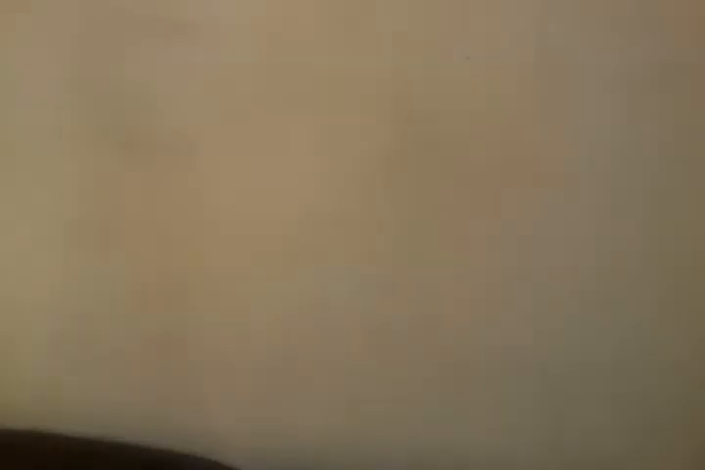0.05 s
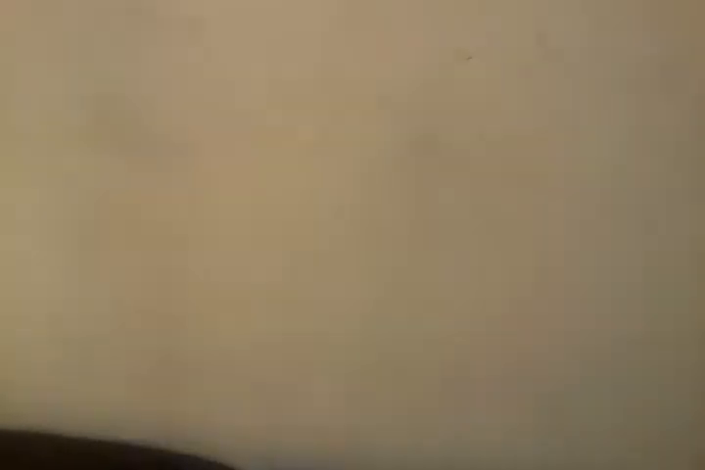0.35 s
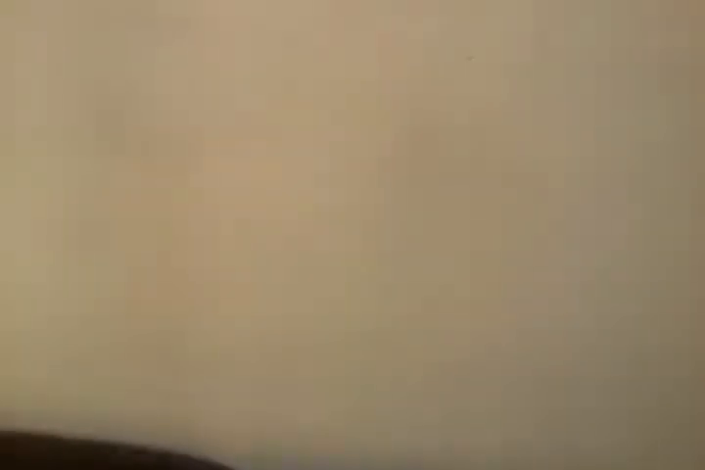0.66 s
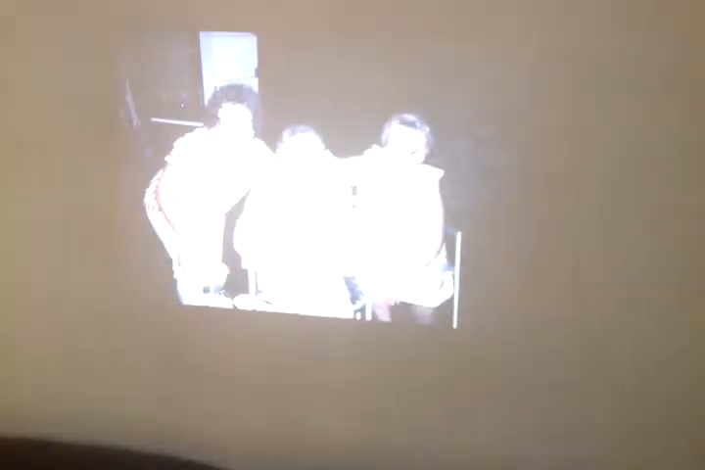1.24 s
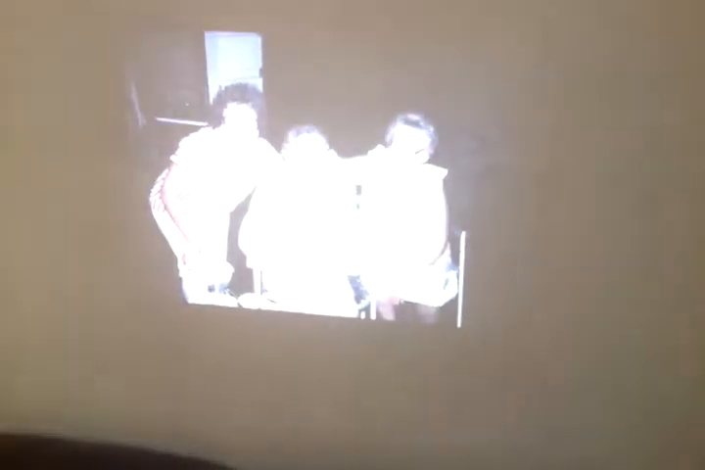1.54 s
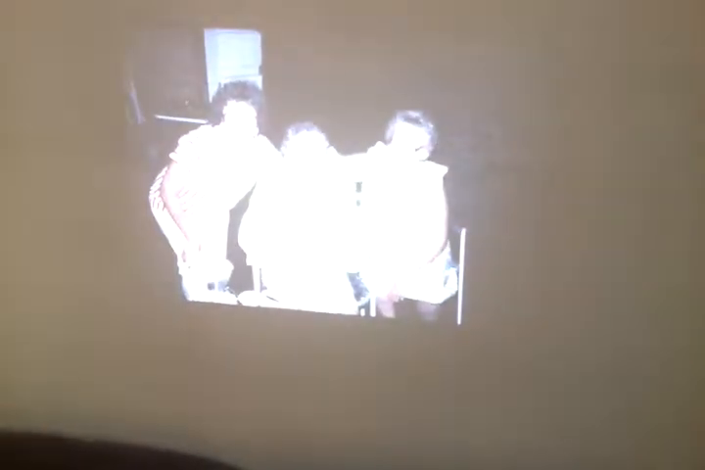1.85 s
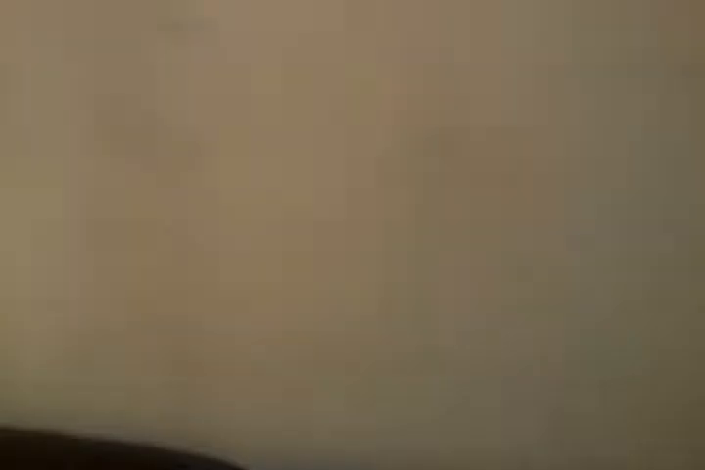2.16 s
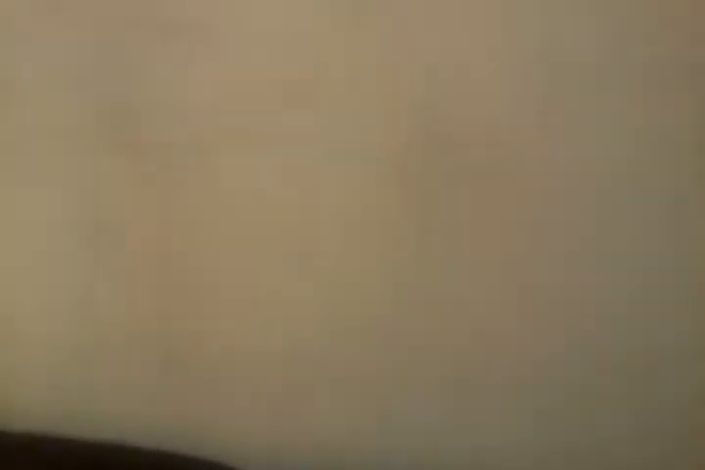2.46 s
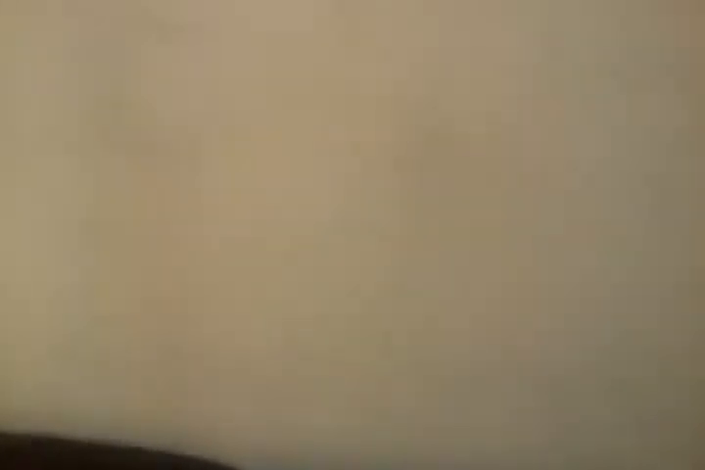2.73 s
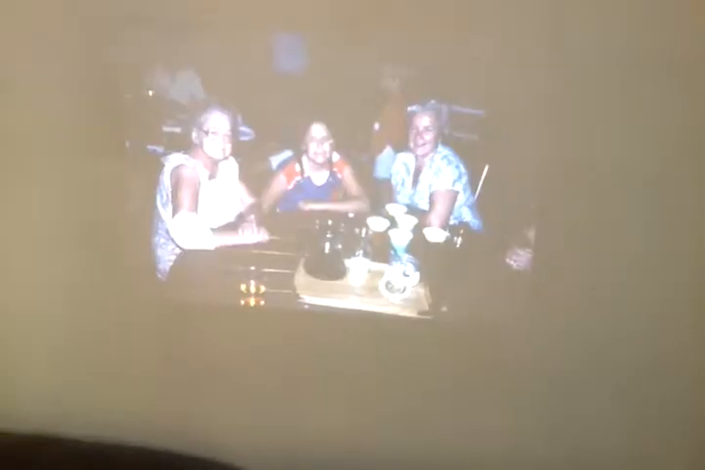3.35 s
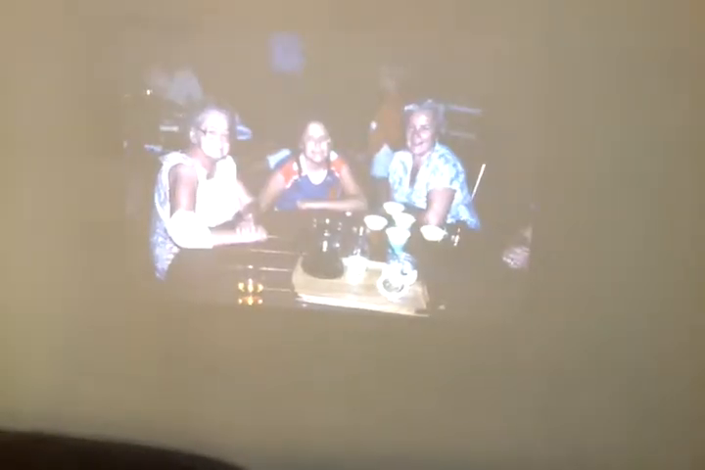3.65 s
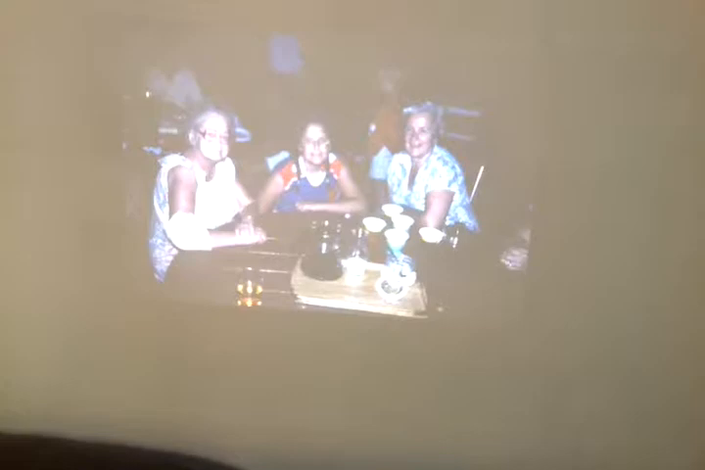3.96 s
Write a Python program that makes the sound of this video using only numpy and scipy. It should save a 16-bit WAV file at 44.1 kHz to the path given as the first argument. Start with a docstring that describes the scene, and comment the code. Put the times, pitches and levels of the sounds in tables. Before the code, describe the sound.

A slide projector changes slides twice in a room, each change a quick run of mechanical clacks and rattles. Its cooling fan rushes steadily throughout, with a low hum and a thin whine.

```python
"""A slide projector changes slides twice in a living room, over the rush and whine of its cooling fan.
Each change is a run of impacts: the shutter shuts, the slide is lifted, the tray steps on, the next slide
drops and the shutter opens. Each impact excites the damped modes of a part; the housing resonates and
the room reverberates. Air through the fan gives broadband noise, the motor and blades give tones."""
import sys
import numpy as np
from scipy import signal
from scipy.fft import rfft, irfft
from scipy.io import wavfile

SR = 44100
rng = np.random.default_rng(int(sys.argv[2]) if len(sys.argv) > 2 else 0)


def generate_wav(sig):
    """Save sig (samples, or channels by samples) to the path in sys.argv[1] as 16-bit PCM at SR."""
    pcm = np.round(np.clip(np.atleast_2d(sig).T, -1, 1) * 32767).astype(np.int16)
    wavfile.write(sys.argv[1], SR, pcm)


N = 176400
TIME = np.arange(N) / SR
HZ = np.maximum(np.arange(N // 2 + 1) * SR / N, 1)


def from_db(db):
    """Amplitude ratio of a level in decibels."""
    return 10 ** (np.asarray(db) / 20)


def rms_one(x):
    """Normalisation to unit rms."""
    return x / np.sqrt(np.mean(np.abs(x) ** 2) + 1e-20)


def at_hz(points, hz):
    """Interpolation on a logarithmic frequency axis."""
    points = np.array(points)
    return np.interp(np.log(hz), np.log(points[:, 0]), points[:, 1])


def drift(rate_hz):
    """Low-passed noise: a slow random wander of unit rms."""
    return rms_one(irfft(rfft(rng.standard_normal(N)) / (1 + (HZ / rate_hz) ** 2), N))


def resonate(x, resonances):
    """Resonance: each two-pole resonator lifts a narrow band and rings on."""
    for hz, width_hz, boost_db in resonances:
        radius = np.exp(-np.pi * width_hz / SR)
        numerator = (1 - radius ** 2) / 2 * np.array([1, 0, -1])
        denominator = [1, -2 * radius * np.cos(2 * np.pi * hz / SR), radius ** 2]
        x = x + (from_db(boost_db) - 1) * signal.lfilter(numerator, denominator, x + 1e-18)
    return x


def tone(hz, db, unsteady, width_hz):
    """Random modulation: narrowband noise carries the unsteady share of a tone's power."""
    waver = drift(width_hz) + 1j * drift(width_hz)
    phasor = np.sqrt(2 * (1 - unsteady)) + np.sqrt(unsteady) * waver
    return from_db(db) * np.real(phasor * np.exp(2j * np.pi * (hz * TIME + rng.random())))


def fan_air():
    """Flow noise: cooling air rushes through a resonant duct, its level fluttering slightly."""
    # spectrum of the airflow: (frequency [Hz], relative density [dB])
    air_spectrum = [(25, -44), (55, -19), (72, -22), (100, -11.5), (140, -13), (210, 1.5), (320, 1.5),
                    (500, 1.5), (750, 0.5), (1000, -0.5), (1300, -2), (1600, -3), (2100, -7), (3200, -10.5),
                    (5000, -14.5), (6300, -19.5), (7100, -27), (7900, -54), (8900, -56.5)]
    # duct resonances: (frequency [Hz], bandwidth [Hz], boost [dB])
    duct = [(1622, 40, 0.5), (2484, 61, 2.5), (3230, 69, 3)]
    rush = irfft(rfft(rng.standard_normal(N)) * from_db(at_hz(air_spectrum, HZ)), N)
    level_db = -45 + 0.33 * drift(rate_hz=11)
    return rms_one(resonate(rush, duct)) * from_db(level_db)


def fan_motor():
    """Periodic forcing: mains hum and blade tones lie under one slowly growing whine."""
    # hum and fan tones: (frequency [Hz], level [dB], unsteady share [0-1])
    tones = [(119.7, -69, .4), (165, -59.5, 0.3), (239.5, -57.5, .4), (407, -61, 0.3), (519, -56, 0.82),
             (726, -60, 0.8), (759, -60, 0.3), (959, -60, 0.3), (1104, -59, .3), (1215, -61.5, 1)]
    whine_db = -55.5 + 1.2 * TIME
    whine = tone(hz=1333, db=whine_db, unsteady=0.03, width_hz=4)
    return whine + sum(tone(hz, db, unsteady, width_hz=5) for hz, db, unsteady in tones)


def room_tail(spectrum, hz, t):
    """Reverberation: the diffuse field builds up, then decays, fastest in the treble."""
    # reverberation times: (frequency [Hz], T60 [s])
    room_decay = [(250, 0.58), (1500, 0.51), (6500, 0.4)]
    build_s = 0.0075
    centres, t60s = np.transpose(room_decay)
    tail = 0
    for t60, selector in zip(t60s, np.eye(len(centres))):
        band_weight = np.interp(np.log(hz), np.log(centres), selector)
        tail = tail + irfft(spectrum * band_weight, len(t)) * from_db(-60 * t / t60)
    return tail * (1 - np.exp(-t / build_s))


def clacks(strikes, attack_s, t60_s, room_db):
    """Modal overlap: a struck lever's many close modes merge into decaying noise, and the room answers."""
    # spectrum of the levers' ringing: (frequency [Hz], relative density [dB])
    lever_spectrum = [(100, -45.5), (220, -20), (350, -6), (480, -1), (620, -1), (1100, -0.5), (1900, -2),
                      (2700, -1.5), (4200, -4.5), (6200, -6), (7000, -15), (7900, -35), (8900, -47.5)]
    bass_hz, middle_hz, treble_hz = 497, 1680, 5100
    size, gain_db = 2 ** 15, 1.5
    t, hz = TIME[:size], np.maximum(np.arange(size // 2 + 1) * SR / size, 1)
    colour = rms_one(from_db(at_hz(lever_spectrum, hz)))
    envelope = (1 - np.exp(-t / attack_s)) * from_db(-60 * t / t60_s)
    out = np.zeros(N + size)
    for onset_s, db, bass_db, treble_db in strikes:
        tilt_db = at_hz([(bass_hz, bass_db), (middle_hz, 0), (treble_hz, treble_db)], hz)
        gain = colour * from_db(gain_db + db + tilt_db)
        direct, diffuse = gain * rfft(rng.standard_normal((2, size)))
        echo = from_db(room_db) * room_tail(diffuse, hz, t)
        start = int(onset_s * SR)
        out[start:start + size] += envelope * irfft(direct, size) + echo
    return out[:N]


def ring(hits, modes):
    """Free vibration: each hit excites a body's distinct modes as damped sinusoids."""
    rise_s = 0.0011
    out = np.zeros(N)
    for onset_s, db, *_ in hits:
        t = np.clip(TIME - onset_s, 0, 1)
        rise = 1 - np.exp(-t / rise_s)
        for hz, mode_db, t60_s in modes:
            out += rise * from_db(db + mode_db - 60 * t / t60_s) * np.sin(2 * np.pi * hz * t)
    return out


def shutter_shutting():
    """Impact and rebound: the shutter strikes its resonant catch."""
    # shutter impacts: (time [s], level [dB], bass [dB], treble [dB])
    strikes = [(.083, -32, 5.5, 9), (.106, -30, 2.5, 4.5), (.122, -30, -2, -9), (.148, -43.5, 6, -2),
               (2.169, -39.5, 8.5, 8), (2.182, -34.5, 1, 1)]
    # catch resonances: (frequency [Hz], bandwidth [Hz], boost [dB])
    catch = [(676, 45, 8), (2514, 140, 4.5), (2983, 69, 4), (3522, 41, 9)]
    return resonate(clacks(strikes, attack_s=0.00039, t60_s=0.087, room_db=-8.5), catch)


def lifter():
    """Impact excitation: the lifter pushes the slide up into the tray and rings against its stop."""
    # lifting impacts: (time [s], level [dB], bass [dB], treble [dB])
    strikes = [(.259, -36, 4, 7.5), (.270, -32, 2, -12), (.293, -30.5, 1, -1), (.378, -44.5, 14, 1.5),
               (2.331, -37, 3, -0.5), (2.354, -35.5, 5.5, 4), (2.369, -31.5, 2, 1), (2.387, -29.5, -1, -5),
               (2.403, -41, 11.5, -16)]
    # lifter resonances: (frequency [Hz], bandwidth [Hz], boost [dB])
    resonances = [(451, 78, 4.1), (2600, 320, 5)]
    # knocks on the stop: (time [s], level [dB])
    knocks = [(.266, -36), (.295, -33)]
    # lifter modes: (frequency [Hz], relative level [dB], T60 [s])
    modes = [(1124, -2.5, .1), (1209, -2, 0.096)]
    clatter = clacks(strikes, attack_s=0.0032, t60_s=0.06, room_db=-8)
    return resonate(clatter, resonances) + ring(knocks, modes)


def pawl():
    """Damped vibration: the pawl rings briefly as it steps the tray on."""
    # pawl impacts: (time [s], level [dB], bass [dB], treble [dB])
    strikes = [(.438, -33, -3, -13), (.449, -40, -3, 1), (2.521, -34.5, -8, -14), (2.534, -42, 12, 3)]
    # pawl resonances: (frequency [Hz], bandwidth [Hz], boost [dB])
    resonances = [(1720, 100, 4), (1920, 120, 3.8), (5500, 90, 9.9), (5850, 110, 7.8)]
    # pawl mode: (frequency [Hz], relative level [dB], T60 [s])
    modes = [(1940, -1.8, 0.058)]
    clatter = clacks(strikes, attack_s=0.0007, t60_s=0.041, room_db=-9.5)
    return resonate(clatter, resonances) + ring(strikes, modes)


def slide_drop():
    """Natural frequencies: each slide rattles into the gate, and its mount lands with its own ring."""
    # impacts in the gate: (time [s], level [dB], bass [dB], treble [dB])
    strikes = [(.644, -35, -8, -8.5), (.666, -30.5, -2, -3.5), (.677, -32.5, -2, 0.5),
               (.685, -28, -13.5, -9.5), (.697, -31, -3.5, -9), (2.727, -38, -4, -5), (2.749, -34, 5.5, 2),
               (2.764, -29, -1, 1.5), (2.770, -29, 3, -25), (2.798, -45, 5, -12.5)]
    # gate resonances: (frequency [Hz], bandwidth [Hz], boost [dB])
    gate = [(890, 78, 3.8), (1410, 69, 5.9), (1617, 37, 4.3), (1810, 63, 4.6), (2650, 350, 3.6),
            (5040, 220, 4.6)]
    # landings at the bottom of the gate: (time [s], level [dB])
    landings = [(0.684, -22), (2.767, -18.5)]
    # modes of each mount: (frequency [Hz], relative level [dB], T60 [s])
    first_mount = [(1638, -13, 0.2), (1780, -14, 0.11), (1915, -2, .03), (2870, -3, 0.028)]
    second_mount = [(864, -5.5, 0.034), (1130, -3.5, 0.031), (2520, -13.5, 0.098), (2770, -5, 0.023)]
    rattle = clacks(strikes, attack_s=0.0017, t60_s=0.071, room_db=-7)
    return resonate(rattle, gate) + ring(landings[:1], first_mount) + ring(landings[1:], second_mount)


def shutter_opening():
    """Impact excitation: the shutter snaps open against its resonant stop."""
    # shutter impacts: (time [s], level [dB], bass [dB], treble [dB])
    strikes = [(.812, -34.5, 2.5, 8.5), (2.896, -36.5, 0, 10.5), (2.909, -38.5, -9, 2.5)]
    # stop resonances: (frequency [Hz], bandwidth [Hz], boost [dB])
    stop = [(730, 51, 4.6), (1400, 55, 5.8), (1915, 86, 11.8), (2595, 61, 9.4), (3750, 60, 7.4),
            (4180, 26, 4), (5550, 31, 6.4), (6480, 85, 8.1)]
    return resonate(clacks(strikes, attack_s=0.0012, t60_s=0.07, room_db=-9), stop)


def cam():
    """Impact noise: the cam and its levers knock between the steps and settle."""
    # cam impacts: (time [s], level [dB], bass [dB], treble [dB])
    strikes = [(.510, -39, -8, -3), (.889, -35.5, 2, 2), (.962, -35, -5.5, -1), (.976, -37.5, 4, 1),
               (.995, -42.5, 12, -11), (2.594, -45, -1, 7), (2.970, -40.5, 2, 8), (2.990, -47.5, 14, 5),
               (3.044, -36.5, -7.5, 1), (3.054, -34, 5, -1.5), (3.074, -41.5, 4.5, -2.5)]
    return clacks(strikes, attack_s=0.0025, t60_s=0.084, room_db=-6.5)


def slide_changer():
    """Structure-borne sound: every part sounds through the housing, which thuds when jolted."""
    # housing resonances: (frequency [Hz], bandwidth [Hz], boost [dB])
    housing = [(486.8, 12, 11), (1160, 120, 2.5)]
    # jolts to the housing: (time [s], level [dB])
    thuds = [(.084, -31.5), (.143, -35), (.262, -38), (.687, -32)]
    # housing mode: (frequency [Hz], relative level [dB], T60 [s])
    modes = [(504, 0.0081, 0.18)]
    parts = shutter_shutting() + lifter() + pawl() + slide_drop() + shutter_opening() + cam()
    return resonate(parts, housing) + ring(thuds, modes)


def scene():
    """Superposition: the changer and the fan add in one channel."""
    return (slide_changer() + fan_air() + fan_motor())[None]


def record(dry):
    """Band limiting: an elliptic low-pass filter cuts the top steeply."""
    cutoff_hz = 8950
    return signal.sosfilt(signal.ellip(10, .1, 80, cutoff_hz, fs=SR, output="sos"), dry)


dry = scene()
out = record(dry)
generate_wav(out)
```